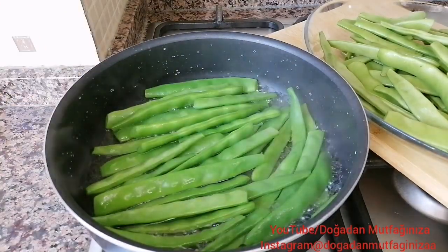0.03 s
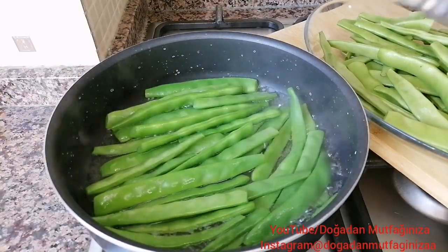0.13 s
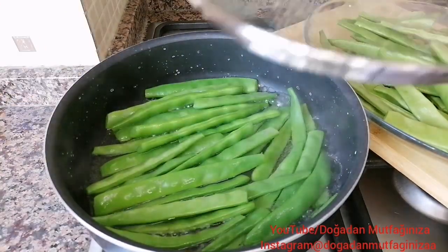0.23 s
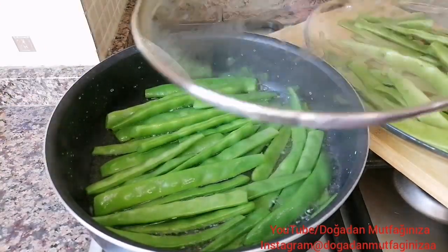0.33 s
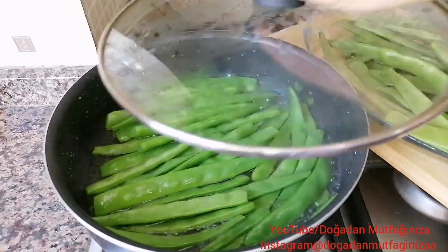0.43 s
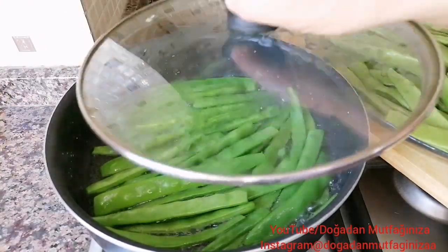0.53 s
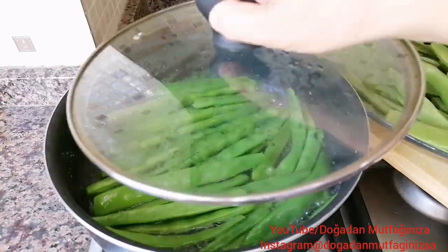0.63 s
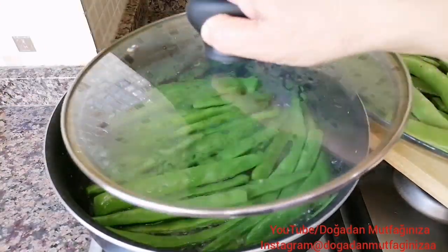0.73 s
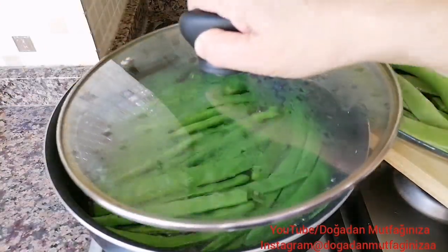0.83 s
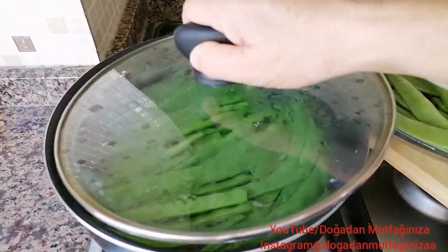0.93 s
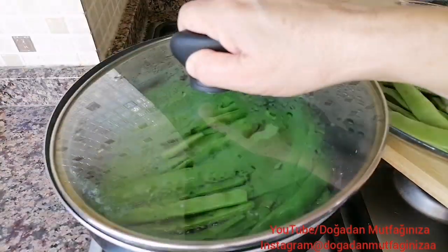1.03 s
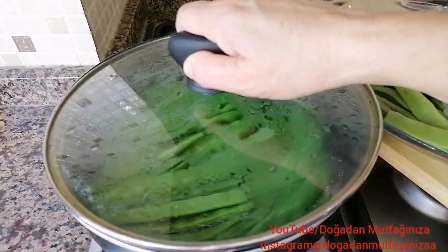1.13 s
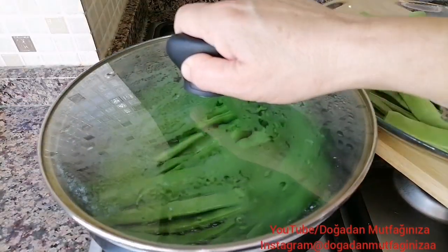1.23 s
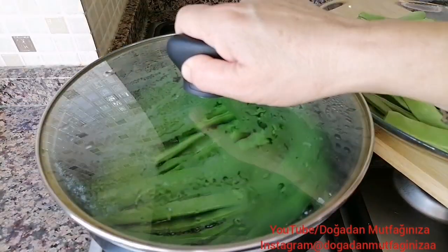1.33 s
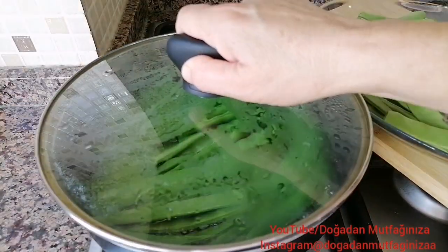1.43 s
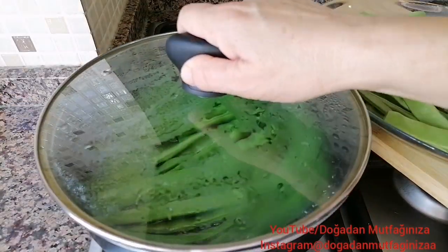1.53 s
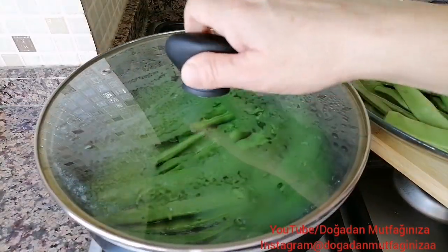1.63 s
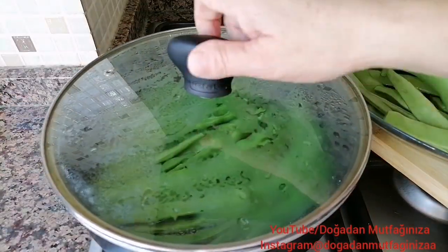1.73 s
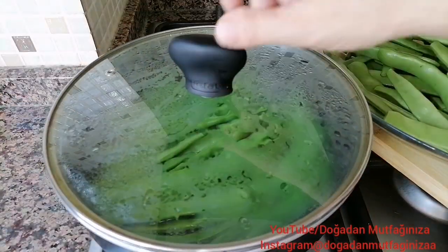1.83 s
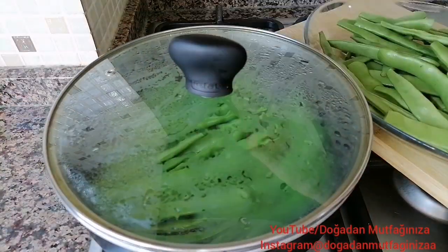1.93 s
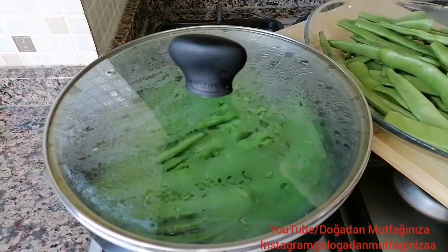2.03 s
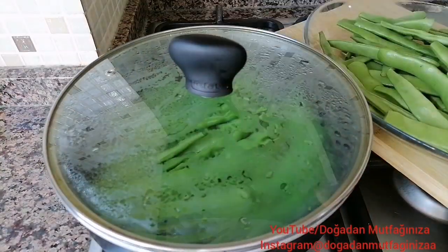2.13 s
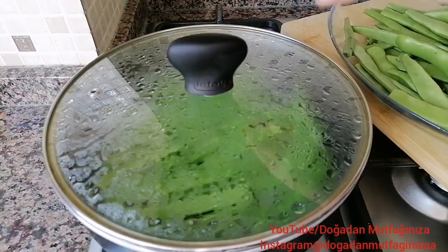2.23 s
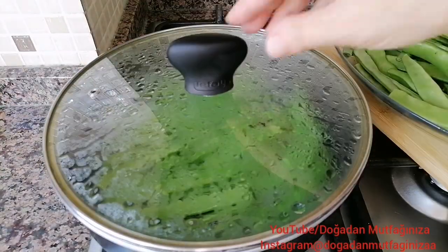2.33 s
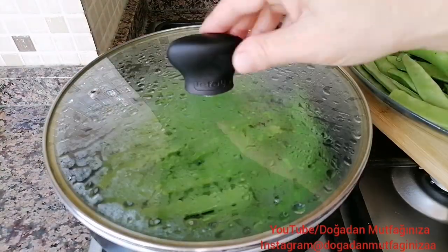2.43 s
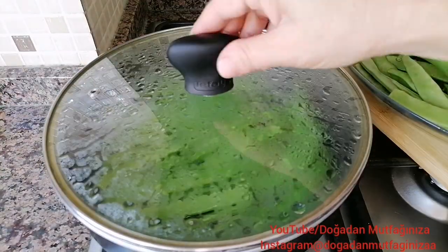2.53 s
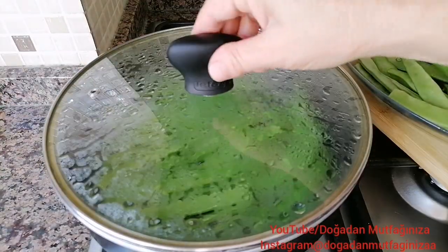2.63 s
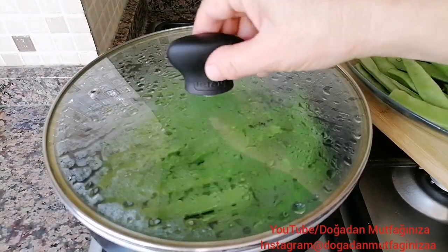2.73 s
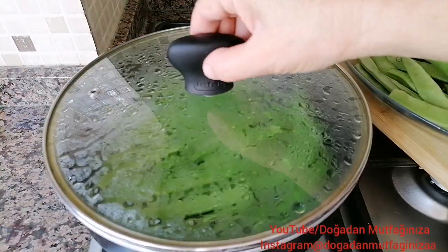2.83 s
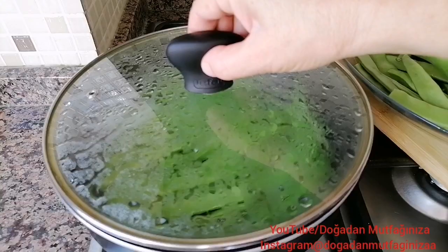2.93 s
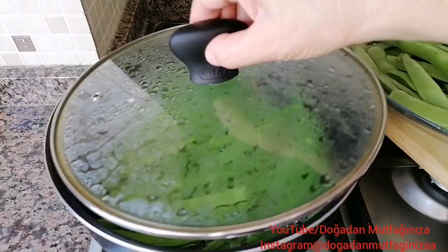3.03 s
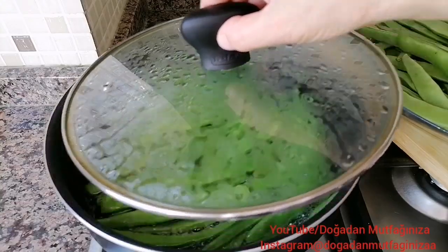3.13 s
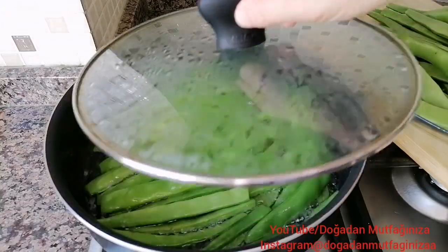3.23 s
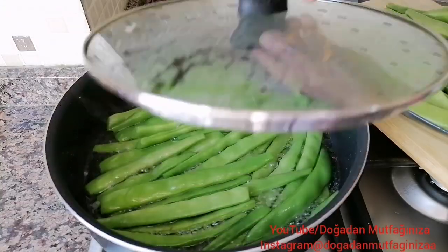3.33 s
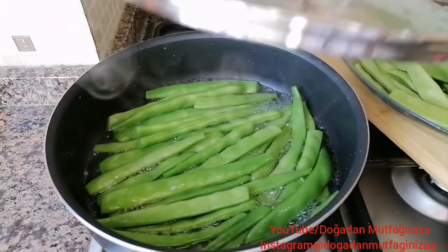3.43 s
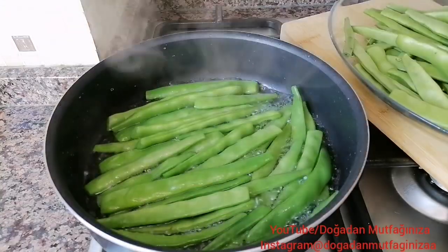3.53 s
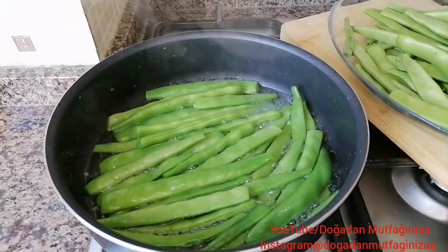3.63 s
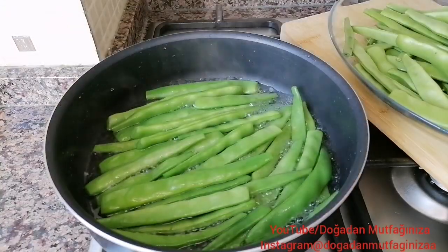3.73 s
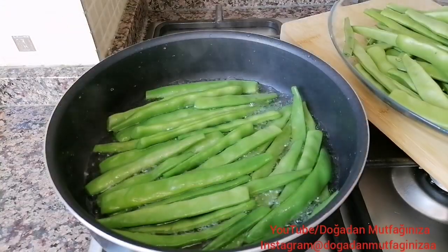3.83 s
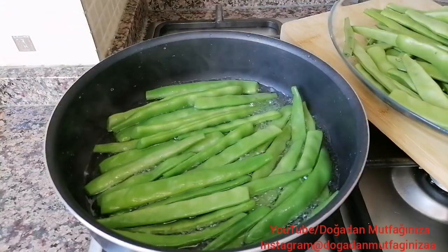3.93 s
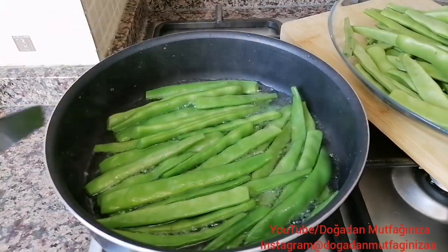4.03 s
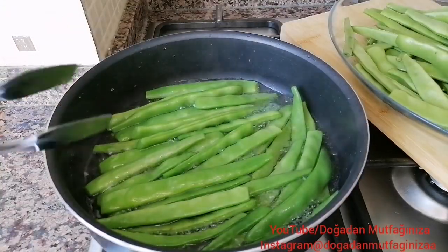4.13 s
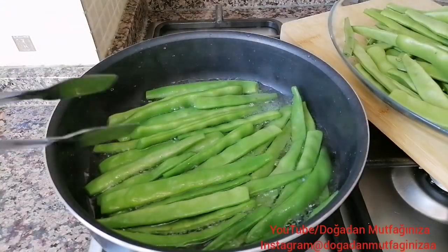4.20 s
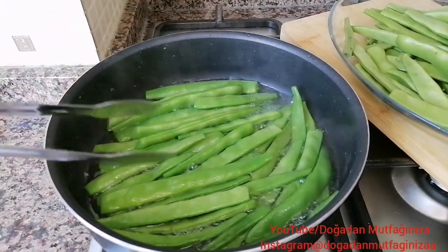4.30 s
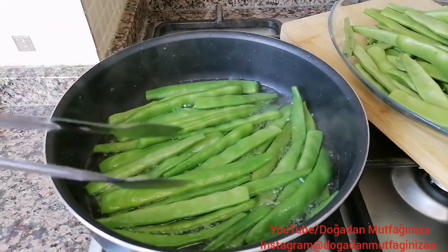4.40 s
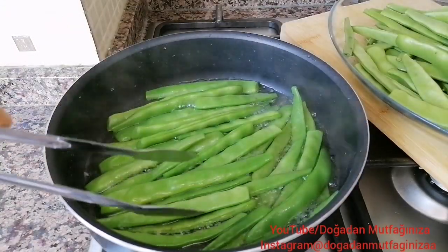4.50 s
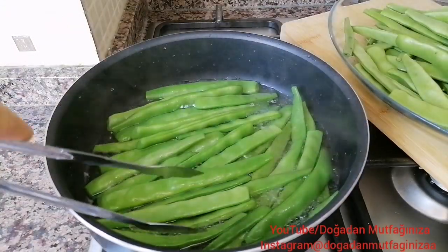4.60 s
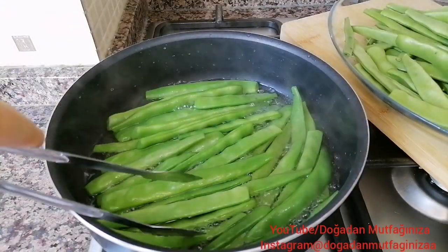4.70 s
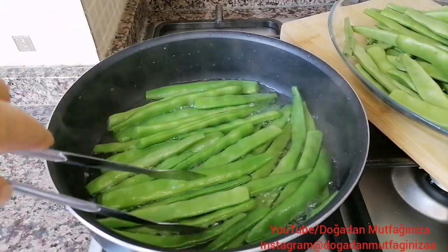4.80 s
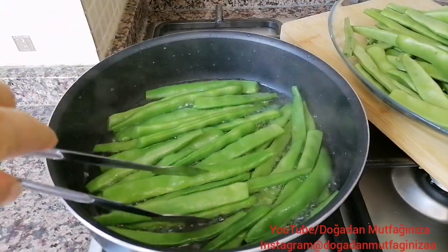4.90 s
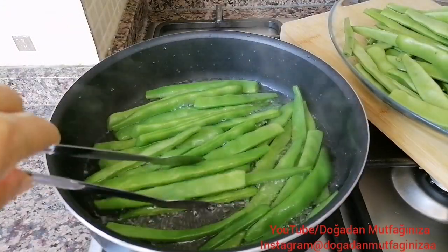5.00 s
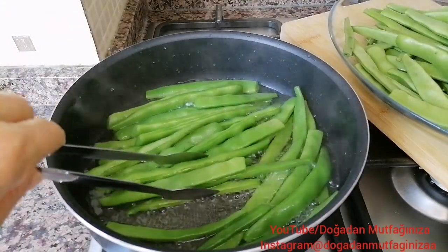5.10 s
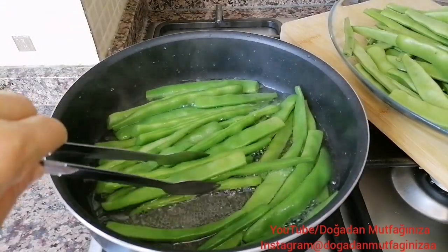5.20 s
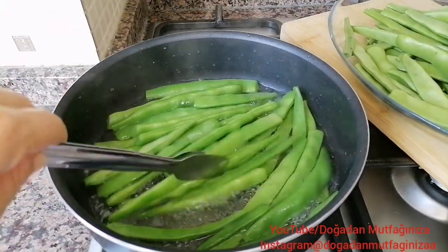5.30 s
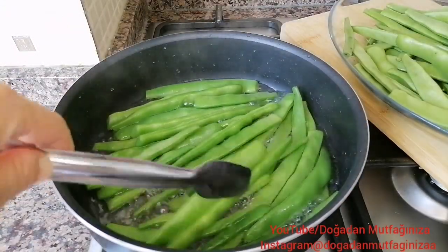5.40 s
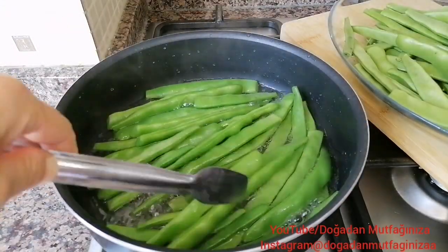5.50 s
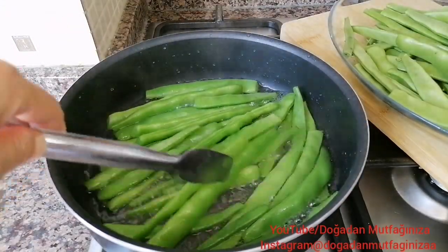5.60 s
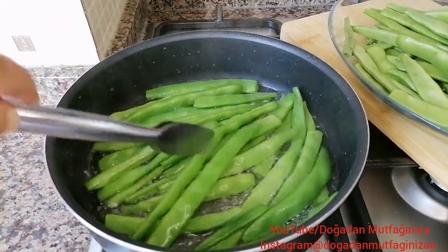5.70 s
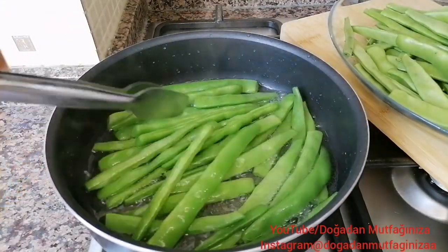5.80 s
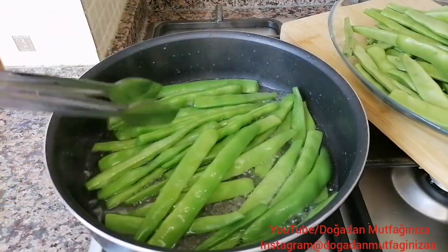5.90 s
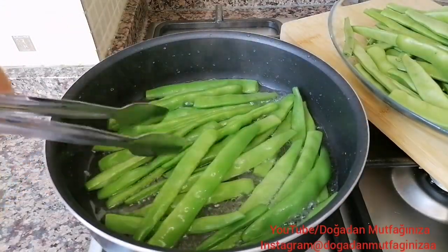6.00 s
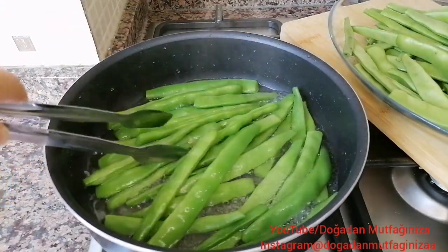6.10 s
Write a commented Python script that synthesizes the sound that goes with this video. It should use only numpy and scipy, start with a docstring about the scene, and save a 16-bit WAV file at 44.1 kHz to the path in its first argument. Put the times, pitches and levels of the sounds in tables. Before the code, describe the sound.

Lively bubbling and spitting muffles as a steel-rimmed lid knocks into place; later, quieter simmering, faint steam whistles, renewed sizzle and a tong tap.

```python
"""A gas flame rushes under a lively simmer, with crackle, fizz and sharp spits from green beans in a pan.
A steel-rimmed glass lid is set on, nudged, and drops into its seat: damped tones ring for lid, air and stove.
After a jump in time the simmer is quieter and steam whistles faintly, a narrow noise that glides in pitch.
The lid is lifted, the pan sizzles up, and tongs tap it and push wet beans onto the hot metal.
Flame, water and fizz are coloured noise and many small damped tones; a small tiled kitchen echoes."""
import sys
import numpy as np
from scipy import signal
from scipy.fft import rfft, irfft, next_fast_len
from scipy.io import wavfile
from scipy.ndimage import map_coordinates

SR = 44100
rng = np.random.default_rng(int(sys.argv[2]) if len(sys.argv) > 2 else 0)


def digitize_waveform(pressure):
    """Quantize a signal to 16-bit integers and store it at the path in sys.argv[1].

    Rows of a 2-D input are taken as channels; values are limited to [-1, 1].
    """
    field = np.atleast_2d(pressure).T
    bounded = np.clip(field, -1, 1)
    quanta = np.round(bounded * 32767).astype(np.int16)
    wavfile.write(sys.argv[1], SR, quanta)


N = 271215  # length in samples
JUMP_S = 2.197  # the jump in time
TOP_HZ = 15750  # upper limit of the sound

# the open pan at a low simmer, and how much louder each part is before the jump
BURNER_DB, BUBBLING_DB, HISS_DB = -69, -67, -66
BURNER_EARLY_DB, BUBBLING_EARLY_DB, HISS_EARLY_DB = 7, 9, 10.5
BUBBLING_SHUT_DB, HISS_SHUT_DB = -10, -6.5  # what the shut lid takes away
# the freshly uncovered pan sizzles up, then settles; a band of small bubbles stands out
SURGE_S, SURGE_RISE_S, SURGE_FALL_S = 3.6, 0.2, 0.3
BUBBLING_SURGE_DB, HISS_SURGE_DB = 0.5, 5
SURGE_RING_HZ, SURGE_RING_WIDTH_HZ, SURGE_RING_DB = 3300, 450, -75.5
# droplets: middle pitch, decay time, trim, and the tone's share of the power (the rest is noise)
SPIT_HZ, SPIT_T60_S, SPIT_GAIN_DB, SPIT_TONE_SHARE = 8860, 0.017, -5.5, 0.3
SMALL_SPITS_PER_S, SMALL_SPIT_DB, SPIT_SCATTER_DB = 10, -54.5, 7.5
# the air under the lid
HUM_SHUT_HZ, HUM_OPEN_HZ, HUM_DB, HUM_FLUTTER_DB = 229.7, 675, -67, 1.6
CLICK_DB, HARD_HZ = 9, 2580  # contacts duller than HARD_HZ click less
WHISTLE_GAIN_DB, WHISTLE_FLUTTER_DB, WHISTLE_WET_DB = 2, 2, -9
WHISTLE_WIDTH_HZ, WHISTLE_FADE_S, CHIRP_WIDTH_S = 140, 0.01, 0.018
# left level minus right level; the shut lid leaks on the right
PAN_EARLY_DB, PAN_LATE_DB, PAN_SHUT_DB, PAN_LID_DB = 1.4, -2.5, -2, 1.3


def amp(db):
    """Decibels to gain."""
    return 10 ** (np.asarray(db) / 20)


def unit(x):
    """Scale to an average strength (rms) of 1."""
    return x / np.sqrt(np.mean(x ** 2) + 1e-20)


def along(points, hz):
    """Read a (pitch, value) curve on a logarithmic pitch axis."""
    f, v = np.transpose(points)
    return np.interp(np.log(hz + 1), np.log(f), v)


def curves(rows):
    """One value per sample for each column after the time."""
    s, *cols = np.transpose(rows)
    return np.array([np.interp(np.arange(N) / SR, s, c) for c in cols])


def wobble(rate):
    """A smooth random curve through `rate` random points a second."""
    points = rng.standard_normal(int(N * rate / SR) + 4)
    return map_coordinates(points, [np.arange(N) * rate / SR])


def filtered(x, response):
    """Change each frequency of x by the given response."""
    n = x.shape[-1]
    m = next_fast_len(n + 8192)  # spare room, so that the end does not wrap onto the start
    return irfft(rfft(x, m) * response(np.fft.rfftfreq(m, 1 / SR)), m)[..., :n]


def coloured(x, spectrum):
    """Give x the colour of a (pitch, dB) curve."""
    return filtered(x, lambda hz: amp(along(spectrum, hz)))


def fade(t, t60):
    """Die away by 60 dB in t60 seconds."""
    return np.exp(-np.log(1000) * t / t60)


def swell(s, width_s):
    """A bell-shaped swell that peaks at time s."""
    return np.exp(-.5 * ((np.arange(N) / SR - s) / width_s) ** 2)


def add(track, s, sound):
    """Mix a sound into the track at time s."""
    part = track[..., max(round(s * SR), 0):][..., :sound.shape[-1]]
    part += sound[..., :part.shape[-1]]


def spread(pair, spectrum):
    """Two unrelated signals become a coloured stereo pair of rms 1."""
    # likeness of left and right: pitch_hz, likeness (1 is identical)
    likeness = [(60, 0.46), (130, 0.36), (320, 0.83), (850, 0.3), (1400, 0.27), (2000, 0.11), (4500, .05),
                (6200, 0.072), (7400, 0.42), (8200, 1), (15000, 1)]

    def turn(hz):
        return np.arccos(np.clip(along(likeness, hz), -1, 1)) / 2

    def mid_side(hz):
        return amp(along(spectrum, hz)) * [np.cos(turn(hz)), np.sin(turn(hz))]

    mid, side = filtered(pair, mid_side)
    return unit(np.array([mid + side, mid - side]))


def from_pan(x, lead_s=0.00012):
    """Sound from the pan arrives on the left slightly before the right."""
    sides = np.array([[1], [-1]])
    return filtered(x, lambda hz: np.exp(1j * np.pi * hz * lead_s * sides))


def in_kitchen(x, wet_db):
    """Add the tiled room's answer, each frequency dying at its own speed."""
    # room decay: pitch_hz, t60_s
    room_decay = [(100, 0.55), (500, 0.39), (2500, 0.36), (8000, 0.22), (15000, 0.06)]
    hz, t, z = signal.stft(rng.standard_normal((2, SR // 2)), SR, nperseg=256)
    z = z * fade(t, along(room_decay, hz)[:, None]) * (1 - fade(t, 0.0044))
    tail = signal.istft(z, SR, nperseg=256)[1]
    echo = signal.fftconvolve(x, tail / np.linalg.norm(tail[0]), axes=1)[:, :x.shape[-1]]
    return x + amp(wet_db) * echo


def short_echoes(x, echo_db, within_s, count=12):
    """Several weak, very short echoes give the hiss a fixed, slightly uneven colour."""
    delay = within_s * rng.uniform(.1, 1, (count, 2, 1))

    def echo_sum(hz):
        return sum((-1) ** k * np.exp(-2j * np.pi * hz * d) for k, d in enumerate(delay))

    return unit(x + amp(echo_db) * filtered(x, echo_sum) / np.sqrt(count))


def bubbles(rate, centre_hz, octaves, cycles, scatter_db):
    """Bursting bubbles of rms 1: short damped tones, a few much larger than the rest."""
    chance = rng.random((int(rate * N / SR), 4))  # a row for each bubble
    hz = centre_hz * 2 ** (octaves * (chance[:, 1:2] + chance[:, 2:3] - 1))
    hz = np.minimum(hz, TOP_HZ)
    size = np.sqrt(hz) * amp(scatter_db * np.minimum(-np.log(1 - chance[:, 3:]), 4))
    k = np.arange(256)
    pops = size * np.sin(2 * np.pi * hz * k / SR) * np.exp(-hz * k / SR / cycles)
    where = (chance[:, :1] * N).astype(int) + k
    return unit(np.bincount(where.ravel(), pops.ravel(), N)[:N])


def narrow(hz, width_hz):
    """Noise of rms 1 in a narrow band whose pitch can move."""
    phase = 2 * np.pi * np.cumsum(hz) / SR
    return unit(wobble(width_hz) * np.cos(phase) + wobble(width_hz) * np.sin(phase))


def opening():
    """How far the lid is off the pan, 0 to 1, as it comes down, seats itself and is lifted away."""
    # lid movement: time_s, opening (0 shut, 1 clear of the pan)
    movement = [(.5, 0.94), (.8, .82), (1.05, 0.68), (1.2, 0), (1.84, 0.059), (2.93, 0.053), (3.15, .4),
                (3.3, 0.71), (3.43, 1)]
    return np.clip(curves(movement)[0], 0, 1)


def simmer(later):
    """The burner rushes, water bubbles between the beans, tiny bubbles fizz on metal; the lid muffles the pan."""
    # colours of the gas flame, the bubbling water and the fine hiss: pitch_hz, level_db (per Hz)
    flame_colour = [(18, -29), (30, 0), (62, 1), (86, -9), (114, -3.5), (289, -12), (322, -0.5), (364, -9),
                    (397, -9), (457, -9.5), (555, -8), (697, -14.5), (891, -9), (1800, -24.5), (2000, -33),
                    (2600, -67), (4400, -120)]
    water_colour = [(240, -13), (400, -4.5), (497, -21), (537, -6), (674, -10), (743, -2), (970, -8.5),
                    (1030, -11), (1400, -5), (1780, -10), (2010, -7), (2540, -10), (2980, -4.5),
                    (4200, -21), (5460, -42), (9240, -120)]
    hiss_colour = [(2060, -5), (3500, -8.5), (3920, -11.5), (5390, -5), (6240, -7.5), (7700, -7),
                   (8420, -3.5), (9030, -1), (9930, -4.5), (11000, -10.5), (14200, -14.5), (14900, -7.5),
                   (15400, -25), (16000, -31)]
    t, early, shut = np.arange(N) / SR, ~later, 1 - opening()
    settling = np.exp(-abs(t - SURGE_S) / SURGE_FALL_S)
    surge = np.where(t < SURGE_S, swell(SURGE_S, SURGE_RISE_S), settling)
    burner_db = BURNER_DB + BURNER_EARLY_DB * early
    bubbling_db = BUBBLING_DB + BUBBLING_EARLY_DB * early + BUBBLING_SHUT_DB * shut + BUBBLING_SURGE_DB * surge
    hiss_db = HISS_DB + HISS_EARLY_DB * early + HISS_SHUT_DB * shut + HISS_SURGE_DB * surge

    def noise():
        return rng.standard_normal((2, N))

    rush = from_pan(spread(noise(), flame_colour), lead_s=0.00017)
    burner = amp(burner_db + 2.1 * wobble(5.1)) * rush

    pops = from_pan(bubbles(rate=600, centre_hz=1670, octaves=2.13, cycles=1.2, scatter_db=5.0))
    pops = unit(coloured(pops, water_colour) * amp(2.6 * wobble(16)))  # bubbles come in clusters
    wash = from_pan(spread(noise(), water_colour), lead_s=0.00015)
    bubbling = amp(bubbling_db + 1.06 * wobble(14)) * unit(0.76 * pops + wash)

    near, far = [bubbles(rate=600, centre_hz=9600, octaves=0.71, cycles=0.97, scatter_db=3.5) for _ in range(2)]
    fizz = coloured(np.array([near + 0.5 * far, near - 0.37 * far]), hiss_colour)
    fizz = unit(fizz * amp(1.6 * wobble(22)))
    grainy = np.where(later, .3, .17)  # less water left: coarser crackle
    hiss = np.sqrt(grainy) * fizz + np.sqrt(1 - grainy) * spread(noise(), hiss_colour)
    hiss = short_echoes(hiss, echo_db=-14, within_s=0.0073)
    flutter_db = np.where(later, 1.1, .6) * (wobble(45) + 0.58 * wobble(7.1))

    ringing = np.array([narrow(np.full(N, SURGE_RING_HZ), SURGE_RING_WIDTH_HZ) for _ in range(2)])
    ringing = amp(SURGE_RING_DB) * surge * ringing
    return burner + bubbling + ringing + amp(hiss_db + flutter_db) * hiss


def gap_hum():
    """The simmer excites the air under the lid; a wider gap hums higher and lets the standing modes out."""
    # standing air modes under the lid: pitch_hz, width_hz, level_db (before the gap scales it)
    air_modes = [(342, 110, -7.5), (1243, 150, -13), (1990, 300, -13), (3340, 650, -7.5)]
    gap = opening()
    hz = HUM_SHUT_HZ + (HUM_OPEN_HZ - HUM_SHUT_HZ) * gap
    standing = sum(amp(db) * narrow(np.full(N, mode_hz), width_hz) for mode_hz, width_hz, db in air_modes)
    half_open = abs(np.sin(np.pi * gap)) ** 0.83  # greatest at half open
    level = amp(HUM_DB + HUM_FLUTTER_DB * wobble(18)) * half_open
    hum = narrow(hz, width_hz=300) + 1.66 * gap * standing
    return in_kitchen(from_pan(level * hum), wet_db=-4.5)


def spits():
    """Droplets burst with a sharp tick: a few loud ones, and many lesser ones that the shut lid muffles."""
    # the loudest bursting droplets: start_s, level_db (before the trim)
    loud = [(0.1109, -38), (0.2468, -41), (0.3086, -38.5), (0.8694, -44), (3.288, -44.5), (3.4237, -44),
            (3.6142, -41.5), (3.9875, -42.5), (4.0243, -46), (5.3064, -50)]
    out, t = np.zeros(N), np.arange(SR // 50) / SR
    muffle_db = 2 * HISS_SHUT_DB * (1 - opening())
    small = []
    for when, size in rng.random((int(SMALL_SPITS_PER_S * N / SR), 2)):
        db = SMALL_SPIT_DB + SPIT_SCATTER_DB * size ** 2 + muffle_db[int(when * N)]
        small.append((when * N / SR, db))
    for s, db in [*loud, *small]:
        hz = SPIT_HZ * np.exp(rng.normal(0, 0.099))  # each droplet has its own pitch
        tone = np.sqrt(2) * np.sin(2 * np.pi * hz * t)
        burst = rng.standard_normal(len(t))
        tick = np.sqrt(SPIT_TONE_SHARE) * tone + np.sqrt(1 - SPIT_TONE_SHARE) * burst
        add(out, s, amp(db + SPIT_GAIN_DB) * fade(t, SPIT_T60_S) * tick)
    out = coloured(out, [(1000, -10.5), (6000, -1), (9000, 1.5), (15000, -4.5)])
    return in_kitchen(np.array([out, out]), wet_db=-13)


def lid():
    """Each knock rings lid and pan, pumps the trapped air and shakes the hob."""
    # lid on pan: start_s, ring_db, brightness_hz (of the contact), air_hz, air_db, thud_db (of the stove)
    knocks = [(1.075, -28, 2170, 390.4, -20.5, -46), (1.2, -31.5, 1540, 342.3, -16, -52),
              (1.377, -41.5, 506, 309.4, -25, -80), (1.403, -40.5, 510, 248, -30.5, -49.5),
              (1.418, -42, 1000, 427, -49, -57.5), (1.84, -23, 4500, 457, -21.5, -23),
              (1.847, -29.5, 1520, 511, -26.5, -35.5), (1.877, -27.5, 1610, 570, -27, -55)]
    # tones of lid and pan, then of the sheet-steel hob: pitch_hz, level_db, t60_s (of the slower part)
    lid_tones = [(336, 0.5, 0.3), (426, -10, 0.62), (450, -17, .25), (492, -2.5, 0.19), (547, -2.5, 0.44),
                 (706, -16.5, .3), (686, -10, 0.21), (810, -2, 0.75), (876, -0.5, 0.41), (1014, -21, 0.252),
                 (1033, -4.5, 0.26), (1115, -7.5, .3), (1132, -6.5, 0.33), (1220, -10, 0.25),
                 (1445, -11, .3), (1620, -3, 0.17), (1875, -14, .3), (2183, -7.5, 0.18), (2320, -8, .15),
                 (2400, -13, .12), (2514, -3, .09), (2730, -26, .2)]
    hob_tones = [(63.3, -3, 0.78), (80, -7, 0.57), (108, 4.5, 0.26), (117.45, 2.5, 0.64),
                 (141.9, -2.5, 0.32), (174, -0.5, 0.45), (228.3, -5.5, 0.61), (256, -6, 0.38)]
    # the dense rest of the modes of lid and pan, then a hard contact: pitch_hz, level_db (per Hz)
    crash_colour = [(190, -28), (330, 3), (504, -4.5), (679, -14.5), (930, -1), (1210, -19), (1630, -11.5),
                    (2000, -14), (2450, -12), (3750, -31.5), (7250, -30), (8480, -35), (14000, -61)]
    click_colour = [(40, -12), (200, -8), (1000, -6), (1800, -12), (2500, -2), (3300, -1), (4900, 2),
                    (5700, -29), (9000, -14), (15000, -35)]
    out, t = np.zeros((2, N)), np.arange(SR * 3 // 4) / SR

    def tone(hz):
        return np.sin(2 * np.pi * hz * t)

    def dull(x, hz):
        return signal.sosfilt(signal.butter(4, min(hz, TOP_HZ), fs=SR, output='sos'), x)

    for s, ring_db, bright_hz, air_hz, air_db, thud_db in knocks:
        ring = np.zeros(len(t))
        for k, (hz, db, t60) in enumerate(lid_tones):
            # the contact damps most of the ring at once; a weak part sings on
            decay = fade(t, 0.025) + 0.036 * fade(t, t60)
            ring += (-1) ** k * amp(db + rng.normal(0, 1.05)) * tone(hz) * decay
        crash = unit(coloured(rng.standard_normal(len(t)), crash_colour))
        crash = (1.45 * fade(t, 0.033) + 0.14 * fade(t, 0.45)) * crash
        ring = dull(ring + crash, bright_hz)  # soft contact is dull
        click = fade(t, 0.04) * coloured(rng.standard_normal(len(t)), click_colour)
        hardness = min(bright_hz / HARD_HZ, 1) ** .5
        click = amp(CLICK_DB) * hardness * dull(click, 1.43 * bright_hz)
        air = tone(air_hz) * fade(t, 0.078) * (1 - fade(t, 0.01))
        hob = np.zeros(len(t))
        for hz, db, t60 in hob_tones:
            hob += amp(db) * tone(hz) * (0.55 * fade(t, 0.16) + 0.54 * fade(t, t60))
        hob *= 1 - fade(t, 0.043)
        # a small sheet radiates no deep bass
        hob = signal.sosfilt(signal.butter(4, 50, 'high', fs=SR, output='sos'), hob)
        metal = in_kitchen(from_pan(ring, lead_s=0.00013), wet_db=-4.5) + from_pan(click)
        boom = amp(air_db) * in_kitchen(from_pan(air), wet_db=-7.5)
        thud = amp(thud_db) * in_kitchen(from_pan(hob), wet_db=-19.0)
        add(out, s, amp(ring_db) * metal + boom + thud)
    return out


def flares():
    """Short crackling swells of sizzle, one as the lid is pushed on, the rest as wet beans are pushed."""
    # swells of sizzle: peak_s, level_db, width_s (of the bell shape)
    sizzles = [(1.092, -55.5, 0.01), (5.094, -63, 0.041), (5.285, -54.5, 0.04), (5.344, -55.5, .012),
               (5.405, -52, 0.0082)]
    # colour of the sizzle: pitch_hz, level_db (per Hz)
    sizzle_colour = [(2650, -44), (4500, -10), (5030, -27), (5900, -11), (6920, -15.5), (8690, 1),
                     (9510, -6), (10400, -4.5), (11800, -10), (14900, -14), (16000, -29)]
    level = sum(amp(db) * swell(s, width_s) for s, db, width_s in sizzles)
    crackle = [bubbles(rate=2400, centre_hz=9800, octaves=.8, cycles=1.2, scatter_db=2) for _ in range(2)]
    return in_kitchen(level * spread(np.array(crackle), sizzle_colour), wet_db=-13)


def chatter():
    """The steel rim slips home, rim against rim, with a few bright clicks."""
    # clicks: start_s, level_db
    rim_clicks = [(1.877, -30.5), (1.8807, -38), (1.89, -40), (1.892, -42), (2.153, -57)]
    # colour of the rim: pitch_hz, level_db (per Hz)
    rim_colour = [(1760, -41), (3000, -6.5), (3890, -16), (4290, -7.5), (4630, -8), (9940, -3.5),
                  (10400, -18.5), (15200, -27), (16000, -44)]
    level, t = np.zeros(N), np.arange(SR // 10) / SR
    for s, db in rim_clicks:
        add(level, s, amp(db) * fade(t, 0.013))
    return in_kitchen(level * spread(rng.standard_normal((2, N)), rim_colour), wet_db=-0.5)


def steam():
    """Steam squeezing past the wet rim whistles in a thin gliding noise, with chirps from smaller leaks."""
    # the whistle rises overall, then sinks once the knob is held: time_s, pitch_hz, level_db (before gain)
    whistle = [(2.36, 6300, -85), (2.376, 6260, -76), (2.392, 6300, -81), (2.48, 6690, -65),
               (2.494, 6800, -70), (2.518, 6180, -65.5), (2.592, 5180, -77), (2.61, 5086, -84)]
    # brief chirps: peak_s, pitch_hz, glide_hz_per_s, level_db
    leaks = [(2.298, 4950, 8000, -75), (2.4, 7450, 6000, -69.5), (2.51, 7150, -5000, -67)]
    t = np.arange(N) / SR
    hz, db = curves(whistle)
    to_nearest_end_s = np.minimum(t - whistle[0][0], whistle[-1][0] - t)
    blowing = np.clip(to_nearest_end_s / WHISTLE_FADE_S, 0, 1)
    level = amp(db + WHISTLE_GAIN_DB + WHISTLE_FLUTTER_DB * wobble(60)) * blowing
    out = level * narrow(hz, WHISTLE_WIDTH_HZ)
    for s, chirp_hz, glide, chirp_db in leaks:
        chirp = narrow(chirp_hz + glide * (t - s), WHISTLE_WIDTH_HZ)
        out += amp(chirp_db) * swell(s, CHIRP_WIDTH_S) * chirp
    return in_kitchen(from_pan(out, lead_s=0.00014), WHISTLE_WET_DB)


def taps():
    """Brief hollow tocks, from a touch, the lid leaving the rim or a tap of the tongs, each with a click."""
    # tocks: start_s, level_db, pitch_hz, click_db (relative to level_db)
    tocks = [(2.502, -59, 457, 5.5), (2.981, -55, 259.6, -15), (5.135, -33.5, 890, -2),
             (5.398, -57.5, 1320, 5), (5.405, -48, 6070, -1)]
    click_colour = [(400, -20), (800, 4.5), (1500, -1.0), (2800, -7.5), (4500, -15), (7000, -12), (9000, -41)]
    out, t = np.zeros(N), np.arange(SR // 20) / SR
    for s, db, hz, click_db in tocks:
        tock = np.sin(2 * np.pi * hz * t) * np.exp(-((t - .0028) / 0.0016) ** 2)
        click = fade(t, 0.047) * coloured(rng.standard_normal(len(t)), click_colour)
        add(out, s, amp(db) * (tock + amp(click_db) * click))
    return in_kitchen(from_pan(out), wet_db=-4)


def scene():
    """The lid's ring ends at the jump in time; afterwards the pan lies a little to the right."""
    later = np.arange(N) / SR > JUMP_S
    side_db = np.where(later, PAN_LATE_DB, PAN_EARLY_DB) + PAN_SHUT_DB * (1 - opening())
    cooking = simmer(later) + gap_hum() + spits() + flares() + steam() + taps()
    clank = (lid() + chatter()) * ~later
    return cooking * amp([side_db / 2, -side_db / 2]) + clank * amp([[PAN_LID_DB / 2], [-PAN_LID_DB / 2]])


def record(dry):
    """Nothing is kept above the upper limit."""
    return filtered(dry, lambda hz: hz < TOP_HZ)


dry = scene()
out = record(dry)
digitize_waveform(out)
```